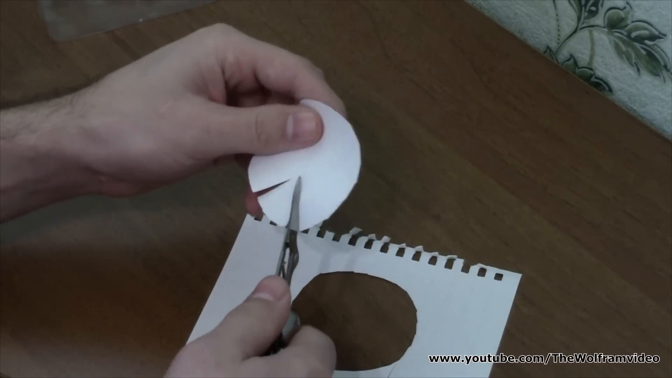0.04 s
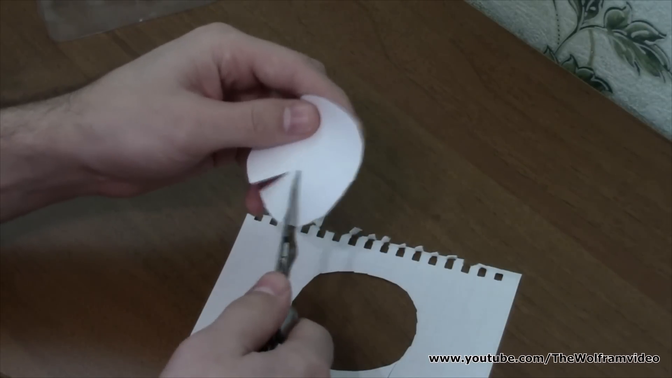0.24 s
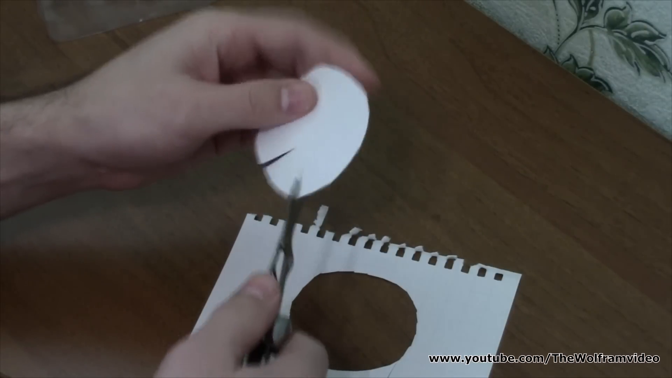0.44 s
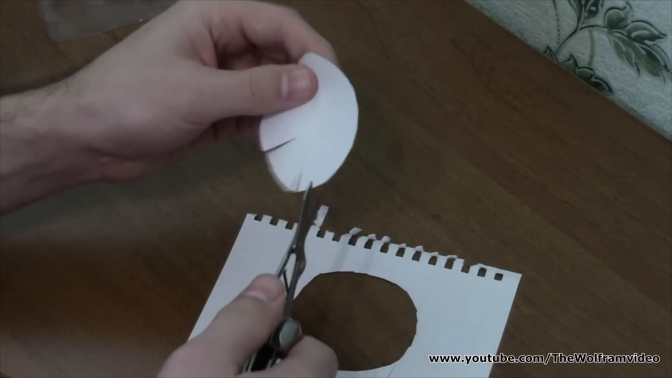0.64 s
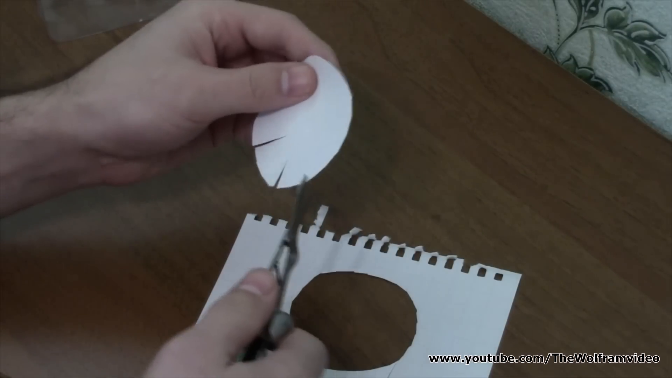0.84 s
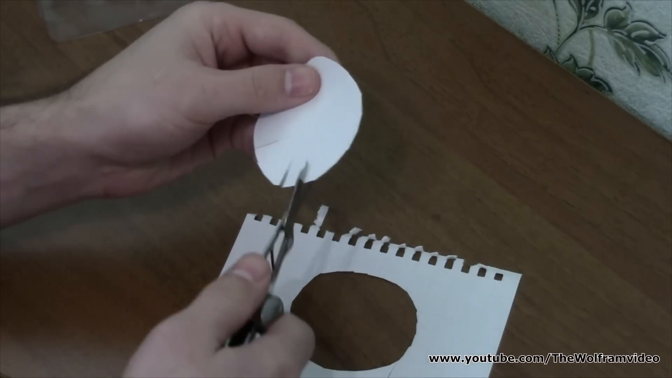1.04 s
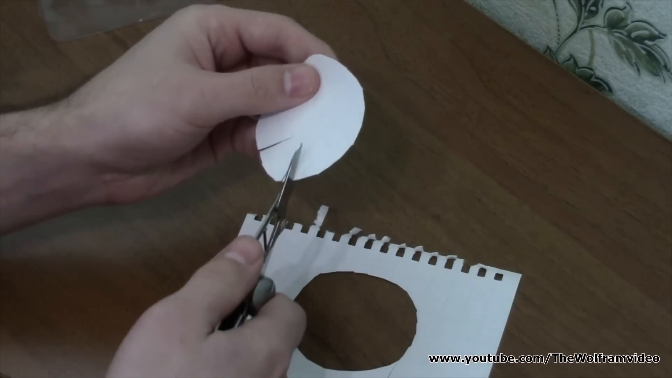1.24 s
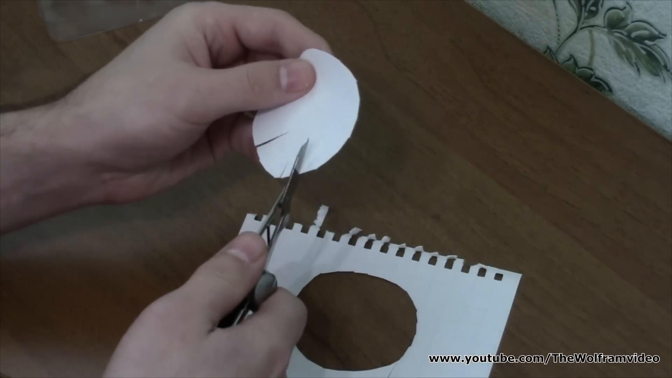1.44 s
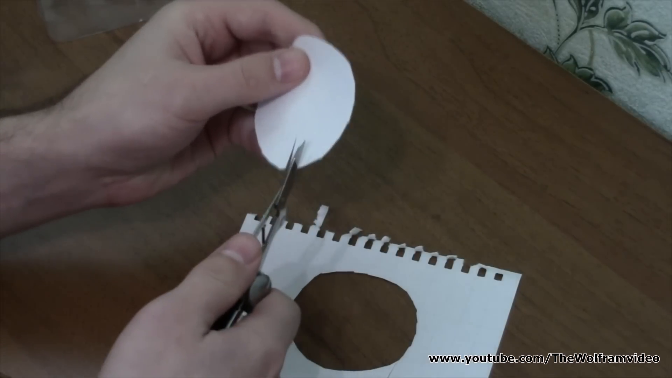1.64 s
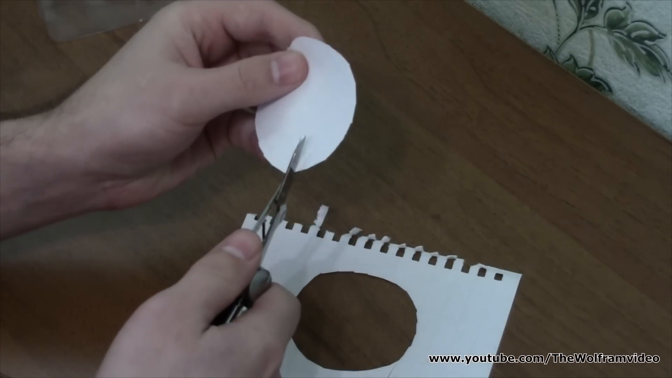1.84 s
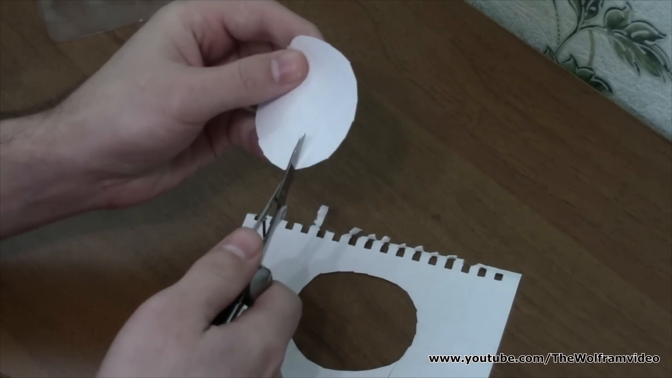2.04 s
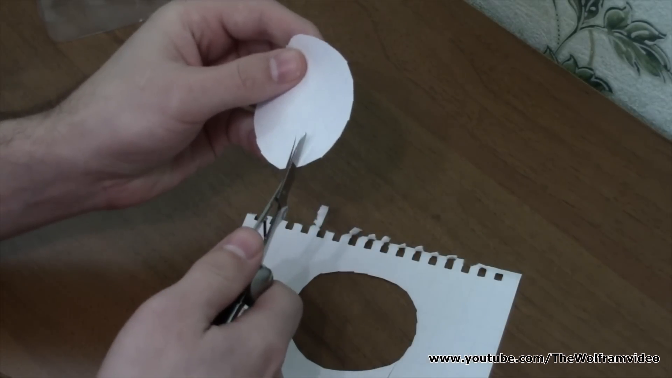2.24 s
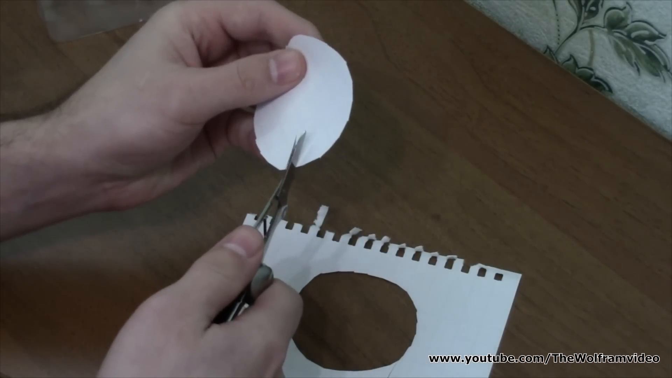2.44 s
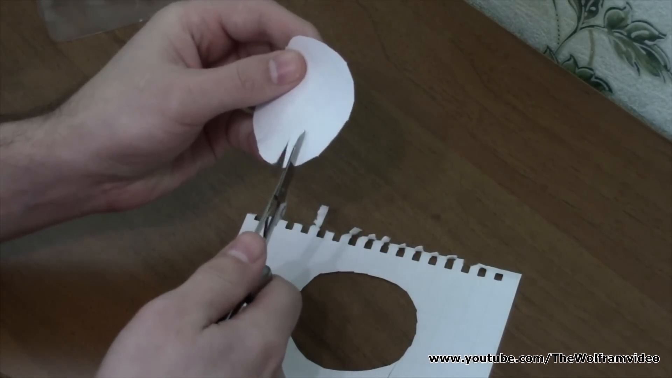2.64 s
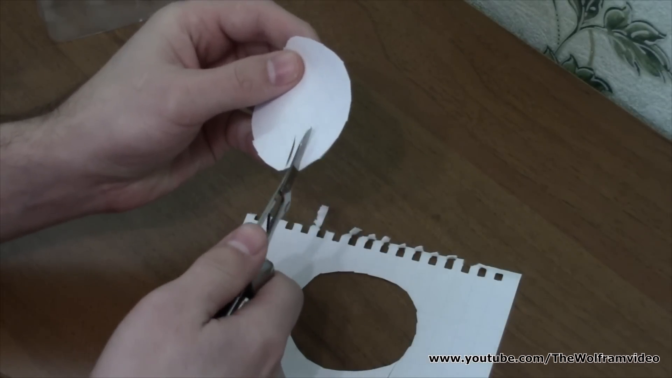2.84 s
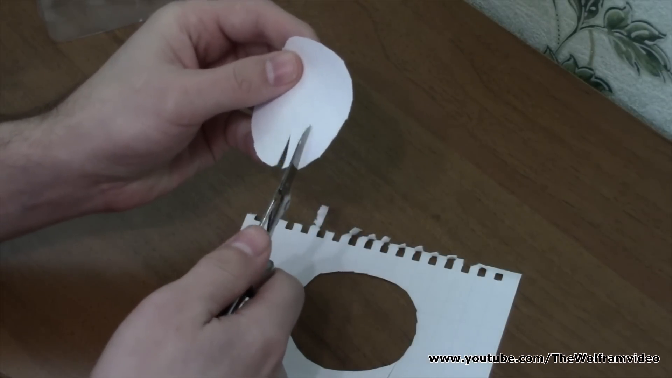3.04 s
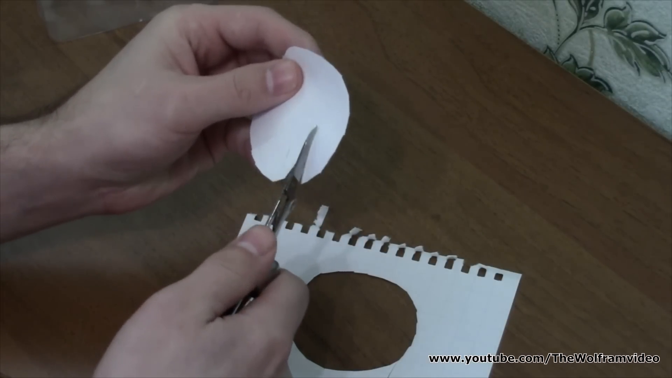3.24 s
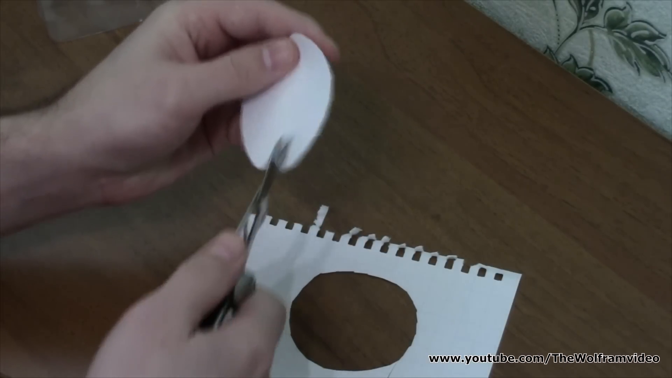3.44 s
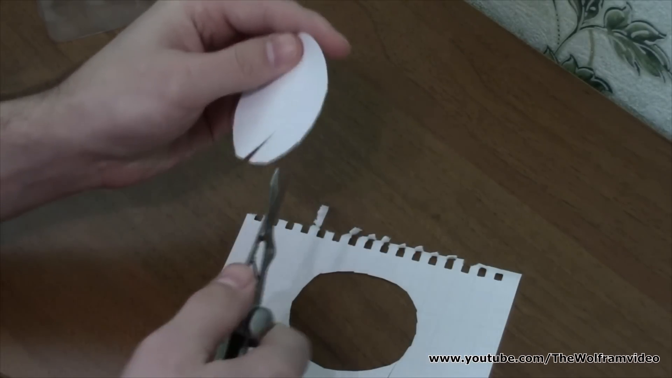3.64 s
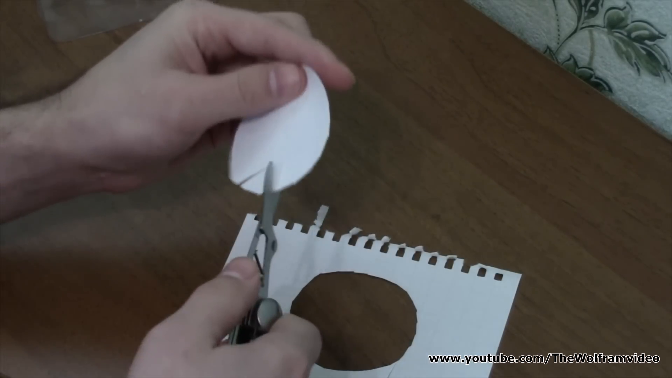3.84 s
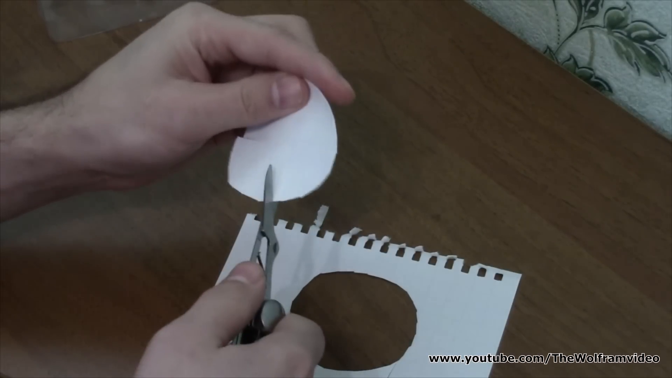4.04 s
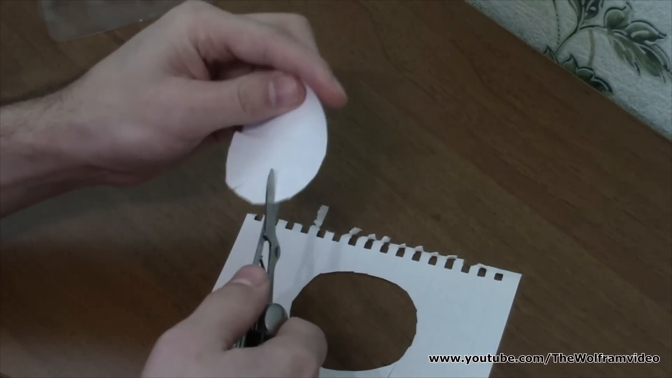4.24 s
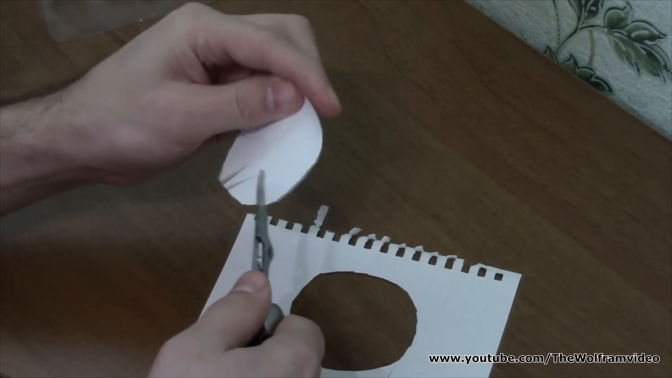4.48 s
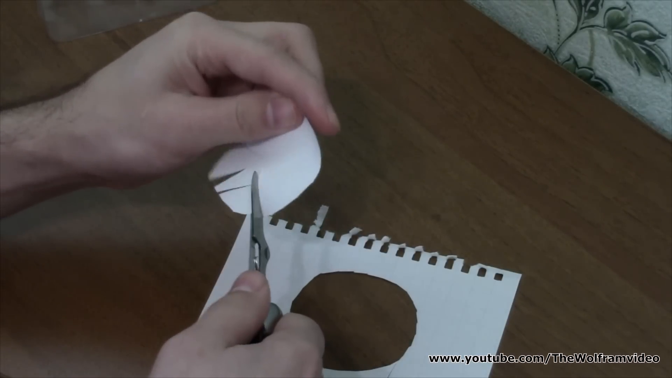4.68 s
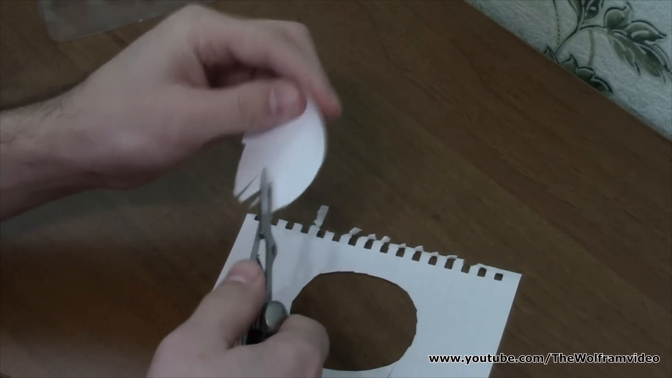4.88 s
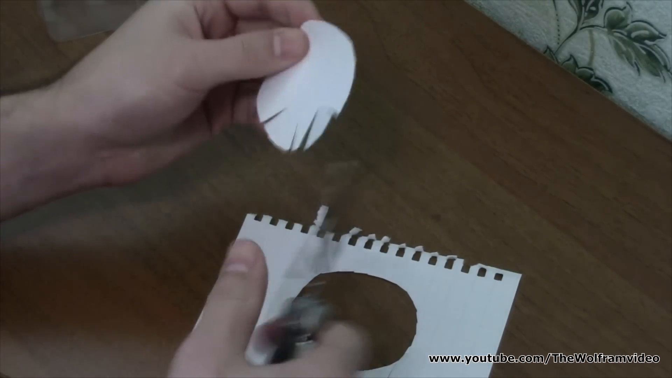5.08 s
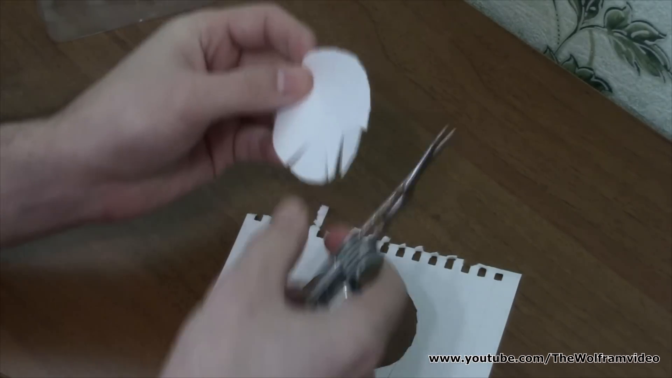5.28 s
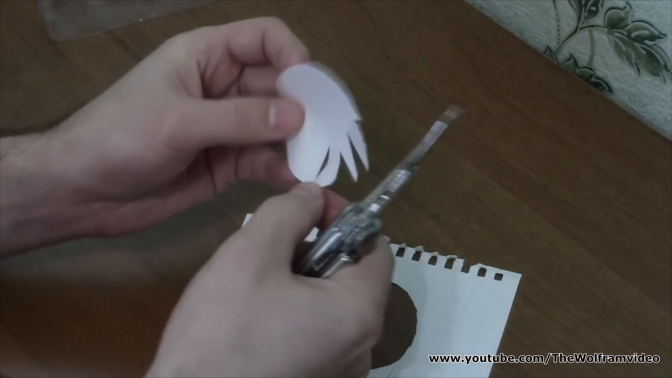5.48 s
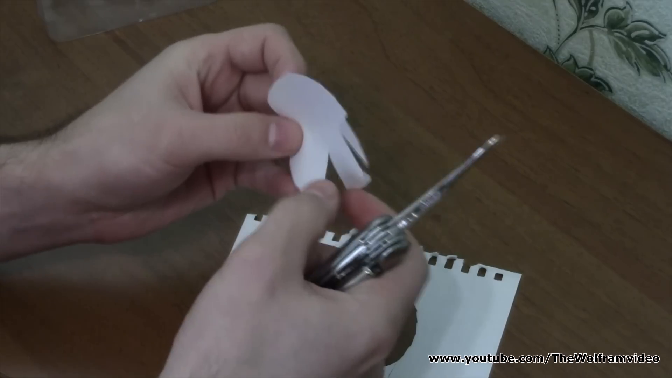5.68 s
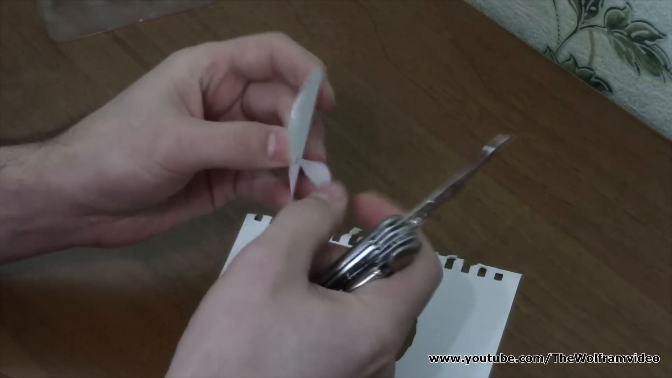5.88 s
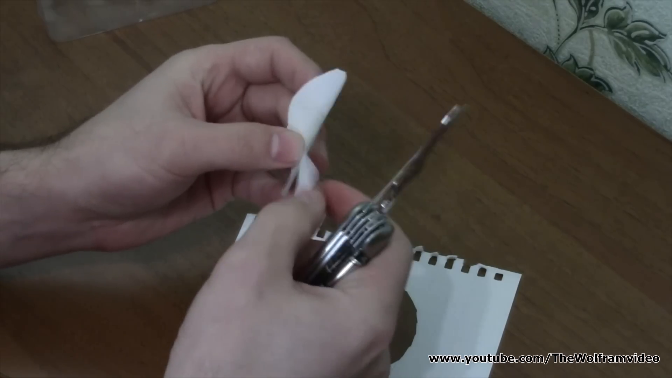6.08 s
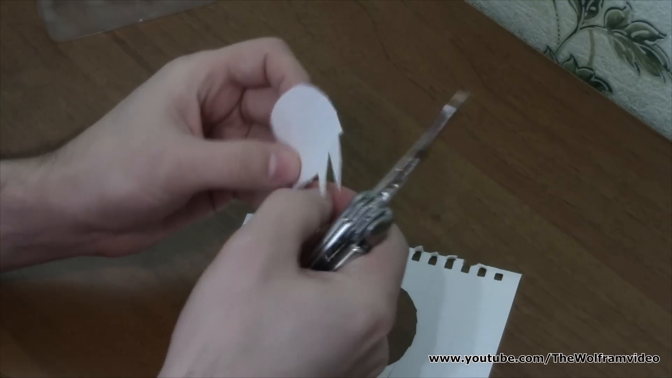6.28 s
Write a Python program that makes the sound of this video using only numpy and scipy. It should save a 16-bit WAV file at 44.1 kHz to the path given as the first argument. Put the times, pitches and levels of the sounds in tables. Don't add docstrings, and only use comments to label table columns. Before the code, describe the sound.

A close stereo microphone hears little scissors shearing paper over a table. A crisp cut and snap open the scene, then quieter slips and isolated clicks, a cluster of crunchy snips, and hard metallic closures. Near the end the sheet is flicked loudly and rubbed faintly. The indoor space is small with short reflections, a steady low hum and light hiss.

```python
import sys
import numpy as np
from scipy import signal
from scipy.fft import rfft, irfft
from scipy.io import wavfile
from scipy.ndimage import uniform_filter1d

SR = 44100
rng = np.random.default_rng(int(sys.argv[2]) if len(sys.argv) > 2 else 0)


def wav_record(signal):
    frames = np.transpose(np.atleast_2d(signal))
    bounded = np.clip(frames, -1, 1)
    quanta = np.round(bounded * 32767).astype(np.int16)
    wavfile.write(sys.argv[1], SR, quanta)


def gain_from_db(level_db):
    decades = np.asarray(level_db, float) / 20
    return 10 ** decades


N = 278712


def rms_one(x):
    return x / np.sqrt(np.mean(x ** 2) + 1e-20)


def in_time(rows):
    s, *columns = np.transpose(rows)
    t = np.arange(N) / SR
    return np.array([np.interp(t, s, column, left=-120, right=-120) for column in columns])


def at_hz(points, hz):
    point_hz, point_db = np.transpose(points)
    return np.interp(np.log(hz), np.log(point_hz), point_db)


def drift(rate_hz):
    r = np.exp(-2 * np.pi * rate_hz / SR)
    settle = 9000
    noise = rng.standard_normal(N + settle)
    return rms_one(signal.lfilter([1], [1, -2 * r, r * r], noise)[settle:])


def resonate(x, hz, width):
    r = np.exp(-np.pi * width / SR)
    zeros = np.array([1, 0, -1]) * (1 - r * r) / 2
    return signal.lfilter(zeros, [1, -2 * r * np.cos(2 * np.pi * hz / SR), r * r], x)


def even(x, size):
    spectrum = rfft(x)
    colour = np.sqrt(uniform_filter1d(np.abs(spectrum) ** 2, size, axis=-1))
    return irfft(spectrum / colour, x.shape[-1])


def whistle(hz, width):
    once = resonate(rng.standard_normal(N), hz, width)
    return rms_one(resonate(once, hz, width))


def room_tone(patchy_db):
    # f/Hz, level/dB per Hz
    hum = [(25, -12), (50, -7.5), (85, -11.5), (125, -3), (155, 2), (200, -8.5), (255, 3), (320, -8),
           (420, -9.5), (800, -10.5), (1100, -15.5), (2500, -19), (4000, -24.5), (9000, -28),
           (16000, -36.5)]
    # f/Hz, correlation [-1..1]
    likeness = [(60, 0.031), (130, 0.34), (300, 0.29), (700, 0.36), (1500, 0.72), (4000, 0.7),
                (15000, 0.57)]
    out = 0
    edges = 20 * 2 ** (np.arange(30) / 3)
    white = rng.standard_normal((2, 2, N))
    flicker = [drift(1.9) for k in range(3)]
    for k, (low, high) in enumerate(zip(edges, edges[1:])):
        band = signal.butter(2, [low, high], "band", fs=SR, output="sos")
        mid, side = signal.sosfilt(band, white[k % 2])
        hz = np.sqrt(low * high)
        alike = np.clip(at_hz(likeness, hz), -1, 1)
        gain = gain_from_db(at_hz(hum, hz) + patchy_db * flicker[k % 3])
        out = out + gain * (np.sqrt(1 + alike) * mid + np.sqrt(1 - alike) * side * [[1], [-1]])
    return gain_from_db(-46) * rms_one(out)


def appliance():
    # f/Hz, width/Hz, level/dB rms
    whines = [
        (839, 10, -67),
        (151.8, 25, -61),
        (123, 8.9, -71),
        (605, 14, -65.5),
    ]
    hums = sum(gain_from_db(db) * whistle(hz, width) for hz, width, db in whines)
    motor_hz, motor_db = 835.0, -61.5
    wander = 1.46 * drift(2.6)
    motor = np.sqrt(2) * np.sin(2 * np.pi * motor_hz * np.arange(N) / SR + wander)
    return hums + gain_from_db(motor_db) * motor


def strokes(rows, peak, bulge):
    level, t = np.zeros((3, N)), np.arange(N) / SR
    for s, length, db, sheet_db, edge_db in rows:
        span = slice(max(round(s * SR), 0), round((s + length) * SR))
        part = np.interp(t[span] - s, [0, peak * length, length], [0, .5, 1])
        arch = np.abs(np.sin(np.pi * part)) ** bulge
        level[:, span] += gain_from_db(db + np.array([[0], [sheet_db], [edge_db]])) * arch
    return level


def cuts():
    bites = [(-.01, 0.036, -31.5, -13.5, 3), (.425, 0.057, -43, 3.5, -1), (1.45, 0.061, -49.5, -15, 2),
             (2.21, 0.069, -55, -8, 1), (2.697, 0.077, -38, -14, -5.5), (2.897, 0.095, -46.5, -2.5, 0.5),
             (3.007, 0.098, -40.5, -11.5, -4), (3.2, 0.12, -44, -9.5, 0.5), (3.285, 0.07, -36, -10, -3.5),
             (3.48, 0.059, -43, -5, -1.5), (4.287, 0.056, -46.5, 0.5, -2), (4.4, .03, -47, -11, -4),
             (4.485, 0.056, -39, -6.5, -2.5), (4.665, 0.19, -45, -2, -5.5), (4.785, 0.052, -42, 6.5, 3),
             (5.032, .085, -42.5, -8, -1), (5.188, 0.037, -46, 3, -22), (5.277, 0.031, -46.5, -18, 0.5),
             (5.553, 0.13, -54.5, -10, 2.5), (5.735, 0.055, -38.5, -1, -2.5),
             (5.845, 0.055, -55.5, 0.5, -2), (5.925, 0.05, -52.5, -10, 8), (6.003, .04, -51, -5, 1),
             (6.29, 0.022, -40.5, 6, 3.5)]
    return strokes(bites, peak=0.079, bulge=0.63)


def tearing(lumps_db, per_s, spread_db):
    sizes = gain_from_db(spread_db * np.minimum(rng.exponential(1, N), 4)) * rng.choice([-1, 1], N)
    grains = sizes * (rng.random(N) < per_s / SR)
    return rms_one(grains * gain_from_db(lumps_db * drift(47)))


def jolt(ms):
    t = np.arange(1024) / SR
    rise_s = 0.00045
    return np.exp(-t * 2000 / max(ms, .3)) * np.minimum(t / rise_s, 1)


def catches():
    # t/s, level over the stroke/dB
    snags = [(.0074, -9), (0.189, 22.5), (.2221, 19.5), (.234, 15.5), (.246, 4), (.258, 11), (.2667, 19),
             (.273, 17), (0.2832, 17), (0.5173, 13), (1.275, 20), (2.731, 17.5), (2.7452, -3), (2.9038, 15),
             (2.9154, 20.5), (3.022, 10), (3.0347, 18), (3.0525, 18), (3.0806, 21.5), (3.206, 24.5),
             (3.2954, 3), (3.313, 9), (3.3467, 20.5), (3.386, 16), (3.3921, 15), (3.505, 11), (3.553, 21.5),
             (4.4697, 21.5), (4.7183, 13), (5.0387, 8)]
    shares = [
        [1.0],
        [1],
        [0.66],
    ]
    marks = np.zeros(N)
    for s, db in snags:
        marks[round(s * SR)] = gain_from_db(db)
    return 1 + signal.fftconvolve(marks, jolt(ms=1.85))[:N] * np.array(shares)


def slides():
    slips = [(.12, 0.12, -52.5, -10, 3.5), (.18, 0.18, -47, -5, 1.5), (.47, 0.11, -38.5, -2.5, 4),
             (.66, 0.054, -56.5, -17, 6.5), (.705, 0.075, -58.5, -12, 2), (.78, 0.053, -62, 7, 6.5),
             (1.11, 0.057, -69, 0, 12), (1.26, 0.14, -50.5, -2, 5.5), (1.66, 0.29, -55.5, -0.5, 1),
             (1.88, 0.099, -44.5, -8, 1), (2.33, 0.058, -70, 4, 11.5), (2.615, 0.087, -47, -24, -4),
             (3.32, 0.11, -46, -3.5, -1), (3.515, 0.1, -41.5, -14, 5), (3.6, 0.061, -50.5, 2.5, -0.5),
             (3.925, 0.12, -51.5, -9, 2.5), (4.0, 0.16, -57, 0, 1.5), (4.43, .075, -35.5, -14, -6),
             (5.695, 0.028, -66, -7, 8), (4.65, 0.023, -41.5, -2, -1), (4.93, 0.14, -47.5, -3, -5.5),
             (5.62, 0.16, -52.5, -6, -2), (6.11, 0.23, -58, -1, -12)]
    return strokes(slips, peak=0.38, bulge=1.45)


def cracks(trim_db):
    # t/s, blade peak level/dB, sheet re blades/dB, edge re blades/dB
    snaps = [(0.3679, -30, -9, -8.5), (.416, -18.5, -4, -2), (0.43, -25, -22, -4.5),
             (1.238, -53, -10, 10.5), (1.4431, -27, -17, -2.5), (2.203, -32.5, -10, -2),
             (3.6634, -45, 2.5, 1), (4.044, -27, -9.5, -11.5), (4.087, -32.5, -23, -12),
             (4.178, -35.5, -26, -19), (4.2166, -28.5, -10, -8.5), (4.2867, -32, -17, 7.5),
             (4.4034, -24, -10, -19), (4.5578, -23, -30, -25), (4.629, -36.5, -11, -9),
             (4.665, -17, -13.5, -16), (4.7911, -18.5, -6, -19), (4.8095, -18.5, -6.5, -11.5),
             (4.8229, -12, -32, -20), (4.828, -19, -13, -29), (4.9287, -36, -4, -5),
             (5.2881, -28.5, -27, -12), (5.5571, -31, -32, -9.5), (5.733, -8, -14, -11),
             (5.7376, -15.5, -32, -8), (5.7482, -7, -24, -11), (5.7559, -19, -14, -13),
             (5.8436, -25.5, -8.5, -9), (6.0037, -34.5, -24, -5), (6.296, -18.5, -12, -13.5)]
    drive, shape = np.zeros((3, N + 1024)), jolt(ms=4)
    noise = shape * rng.standard_normal((len(snaps), 3, 1024))
    bursts = even(noise, size=9) * np.linalg.norm(shape) * (shape > 1e-3)
    for (s, db, sheet_db, edge_db), burst in zip(snaps, bursts):
        i = round(s * SR)
        level_db = db + np.array([0, sheet_db, edge_db]) + trim_db
        drive[:, i:i + 1024] += gain_from_db(level_db)[:, None] * burst
    return drive[:, :N]


def body(x, modes, lean_db, curl_db, top_hz):
    hz, width, db = np.transpose(modes)
    octaves = np.log2(hz / np.median(hz))
    wander_db = 1.47 * np.array([drift(11.0) for f in hz])
    lean = gain_from_db(np.outer(octaves, lean_db) - np.outer(octaves ** 2, curl_db) + wander_db)
    power = width * gain_from_db(2 * db)
    share = power / np.sum(power)
    lean = lean / np.sqrt(share @ lean ** 2)
    click = np.eye(1, 4096)[0]
    rings, click_rings = 0, 0
    for k in range(len(hz)):
        gain = (-1) ** k * gain_from_db(db[k])
        rings = rings + gain * resonate(x * lean[k], hz[k], width[k])
        click_rings = click_rings + gain * resonate(click, hz[k], width[k])
    dull = signal.butter(2, min(top_hz, .45 * SR), fs=SR, output="sos")
    return signal.sosfilt(dull, rings) / np.sqrt(np.sum(click_rings ** 2))


def scissors():
    # f/Hz, width/Hz, level/dB
    blades = [(2340, 580, -11), (3090, 253, 1.5), (3390, 295, -1.5), (3660, 128, -2), (4040, 214, -0.5),
              (4910, 530, -9)]
    # f/Hz, width/Hz, level/dB
    sheet = [(493, 132, -0.5), (779, 121, 0.5), (1102, 360, -1.5), (1350, 280, 2), (1562, 135, 0),
             (2025, 210, -13.5)]
    # f/Hz, width/Hz, level/dB
    edge = [(6040, 2000, -7.5), (6670, 290, -2), (7200, 520, -9.5), (8500, 770, -5.5), (9670, 1380, -7),
            (11630, 1550, -11.5), (13800, 3400, -15)]
    tops_hz = (6600, 3100, 17000)
    # t/s, blades, sheet, edge [dB per octave]
    grip = [(0, -5, -2, 3), (.27, -3, 3.5, 7), (.47, -2, 5.5, -6.5), (1.3, 3, 12, 4), (1.9, 4, 5, 8),
            (2.73, 0, -5, 1), (2.92, -2, 8, 4), (3.06, -8, -3, -1), (3.22, 1, 7, 4.5), (3.35, -4, -5, 5),
            (3.56, -3, 7, -8.5), (4.05, 6, -4, -8), (4.3, -4, -1.5, 6.5), (4.67, 7, 7, 2),
            (4.82, 0, 4.5, -1), (5.2, -3, 3, 5.5), (5.74, -3.5, 4, -2.5), (6.3, -6, 2, 4)]
    # t/s, curl [dB per octave squared]
    curl = [(0, 23), (.27, 11), (.42, 0), (.53, 30), (.7, 20), (1.3, 40), (1.9, 15), (2.3, 22), (2.8, 9),
            (3.3, 11), (3.56, 26), (4.0, 16), (4.3, 21), (4.5, 10), (5.2, 6), (5.74, -5), (5.95, 9),
            (6.4, -3)]
    level = (cuts() + slides()) * catches()
    slip = gain_from_db(1.17 * drift(36))
    grains = [
        tearing(lumps_db=2.95, per_s=5000, spread_db=3.3),
        tearing(lumps_db=3.44, per_s=4000, spread_db=2.7),
        tearing(lumps_db=3.2, per_s=11000, spread_db=3.2),
    ]
    drive = level * slip * grains + cracks(trim_db=np.array([-4.0, 3.0, 4.0]))
    lean_db = in_time(grip + [(7, 0, 0, 0)])
    curl_db = in_time(curl) * [[0], [0], [1]]
    bodies = zip(drive, (blades, sheet, edge), lean_db, curl_db, tops_hz)
    return sum(body(*settings) for settings in bodies)


def finger_rub():
    # t/s, level/dB
    rub = [
        (6.1, -90),
        (6.13, -61),
        (6.2, -61),
        (6.27, -53),
        (6.29, -90),
    ]
    return gain_from_db(in_time(rub)[0]) * whistle(3680, 260)


def room(x, t60_low, t60_high, spread, spread_high):
    t = np.arange(int(.4 * SR)) / SR
    white = rng.standard_normal((2, len(t)))
    dull = signal.lfilter([.3], [1, -.7], white)
    tails = dull * gain_from_db(-60 * t / t60_low) + (white - dull) * gain_from_db(-60 * t / t60_high)
    tails = tails * np.clip((t - .002) / 0.0045, 0, 1)
    mid, side = even(tails, size=101) * (t > .002) * (t < .25)
    side_low = signal.lfilter([.3], [1, -.7], side)
    side = spread_high * side + (spread - spread_high) * side_low
    wall_dull = 0.22
    tail = signal.lfilter([1], [1, -wall_dull], mid + side * [[1], [-1]])
    tail = tail / np.sqrt(np.sum(tail ** 2) / 2)
    return signal.fftconvolve(x[None], tail, axes=1)[:, :N]


def scene():
    background = room_tone(patchy_db=1.3) + appliance()
    hands = scissors() + finger_rub()
    direct = hands * gain_from_db([[-.25], [.25]])
    reflections = room(hands, t60_low=0.21, t60_high=0.076, spread=0.041, spread_high=0.12)
    return direct + gain_from_db(-7.0) * reflections + background * gain_from_db([[-.4], [.4]])


def top_cut(x):
    return signal.sosfilt(signal.butter(12, 16510, fs=SR, output="sos"), x)


def record(dry):
    top = signal.cheby2(10, 30, 16000, fs=SR, output="sos")
    mix = signal.sosfilt(top, dry)
    return top_cut(mix)


dry = scene()
out = record(dry)
wav_record(out)
```